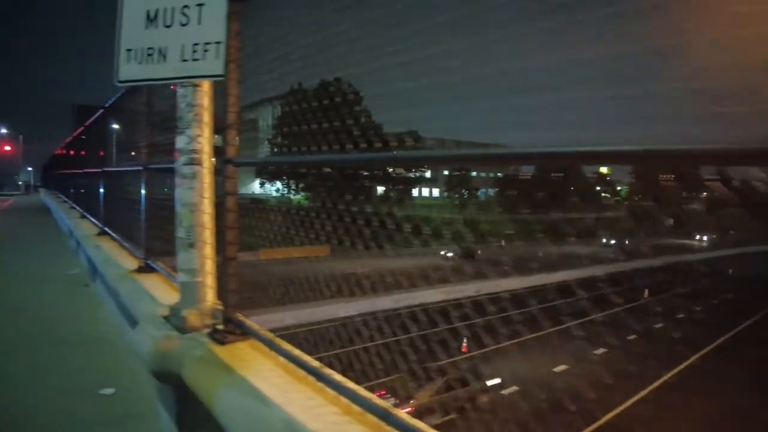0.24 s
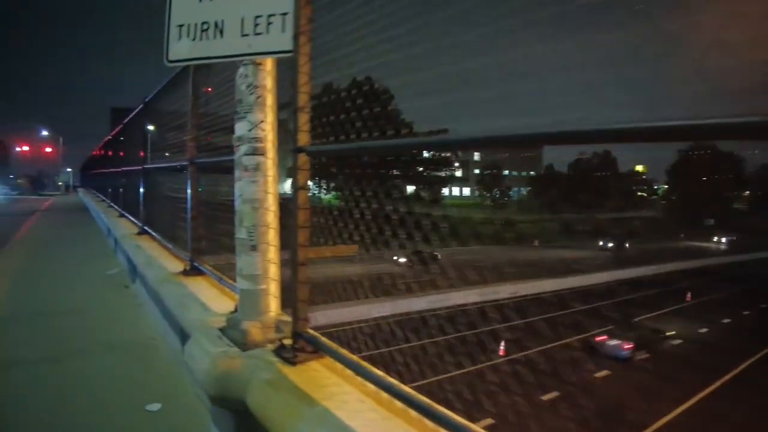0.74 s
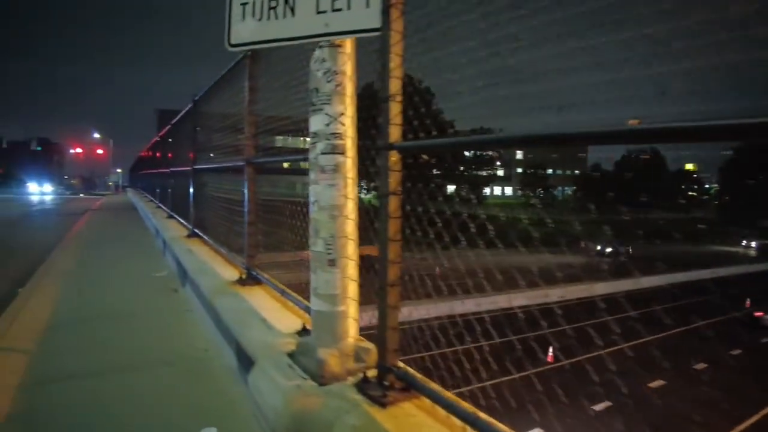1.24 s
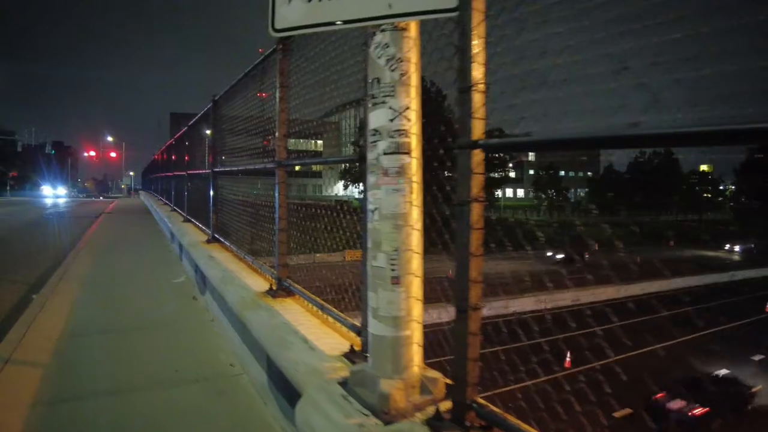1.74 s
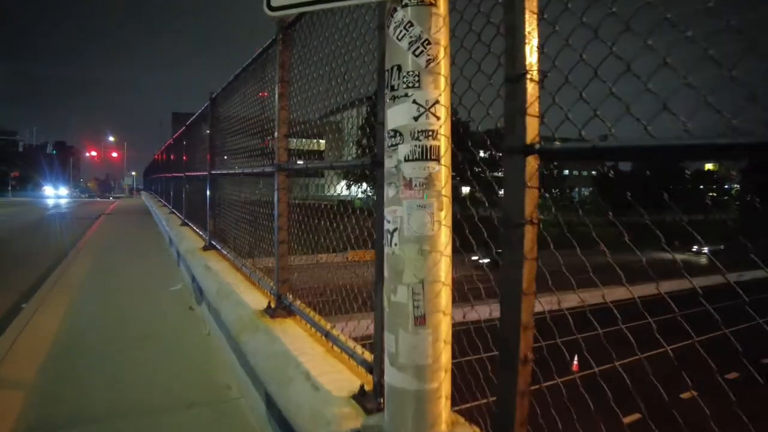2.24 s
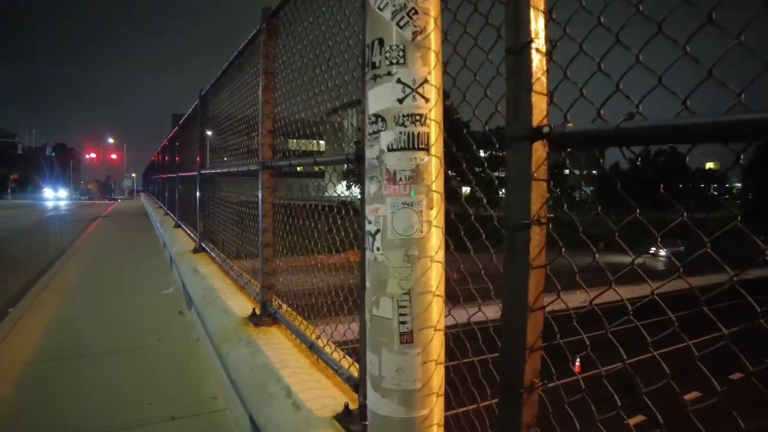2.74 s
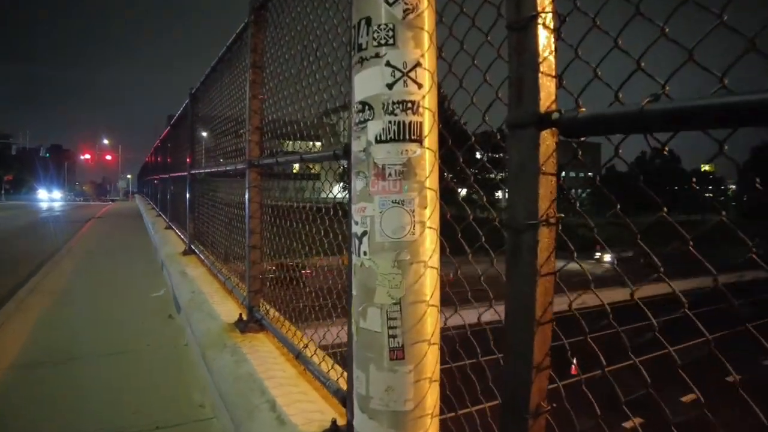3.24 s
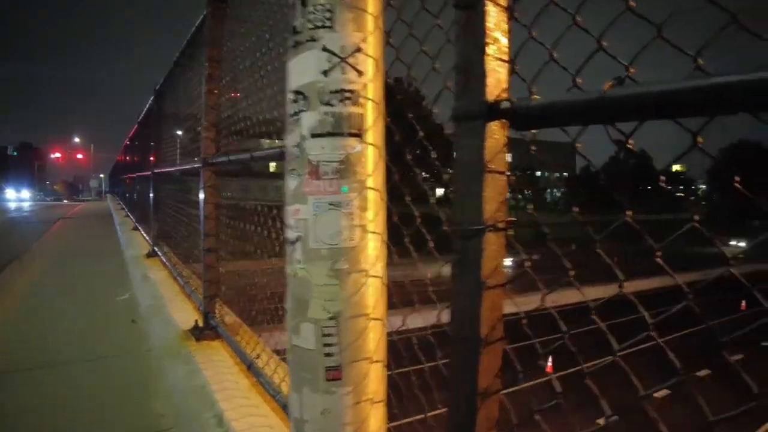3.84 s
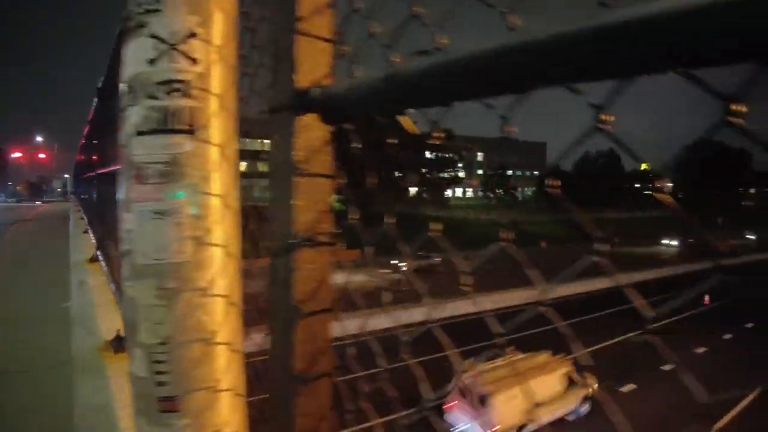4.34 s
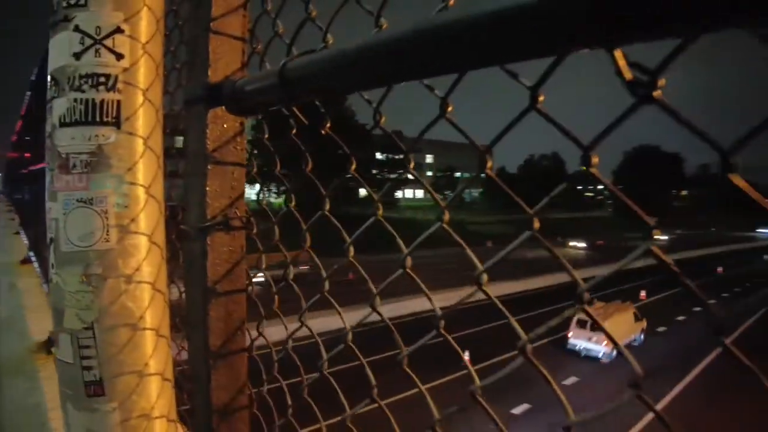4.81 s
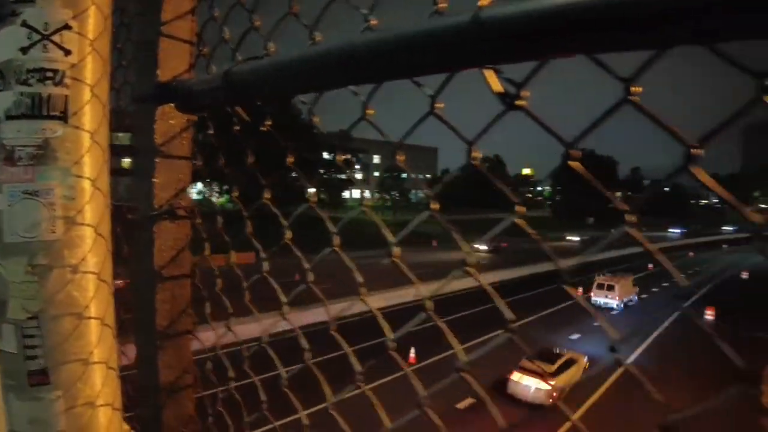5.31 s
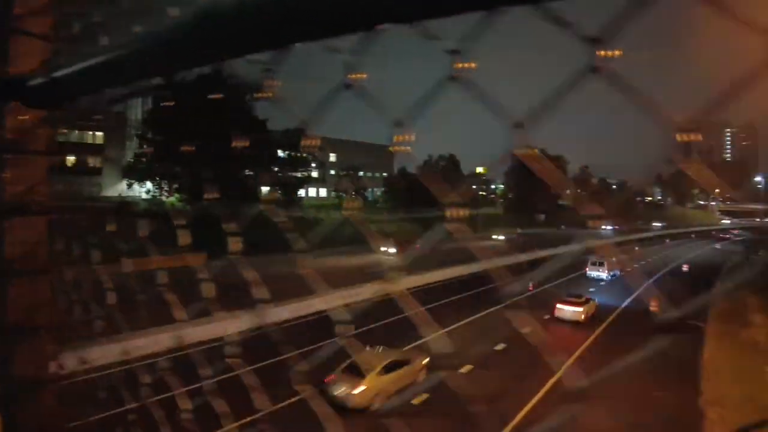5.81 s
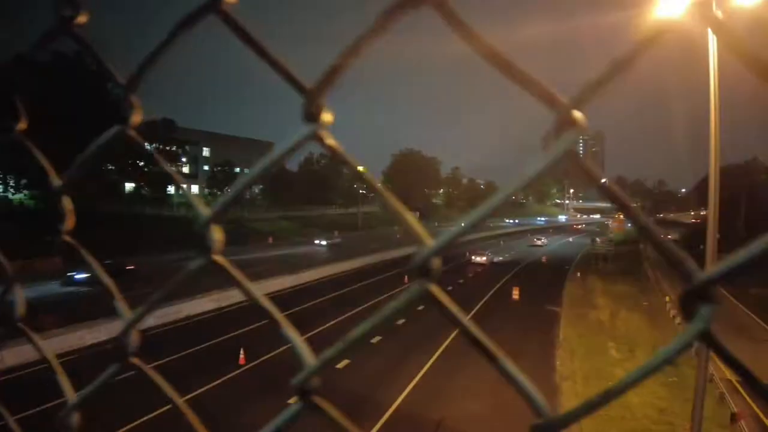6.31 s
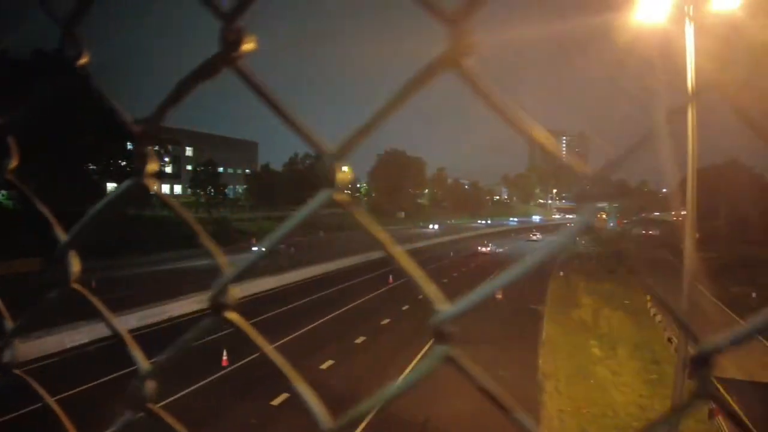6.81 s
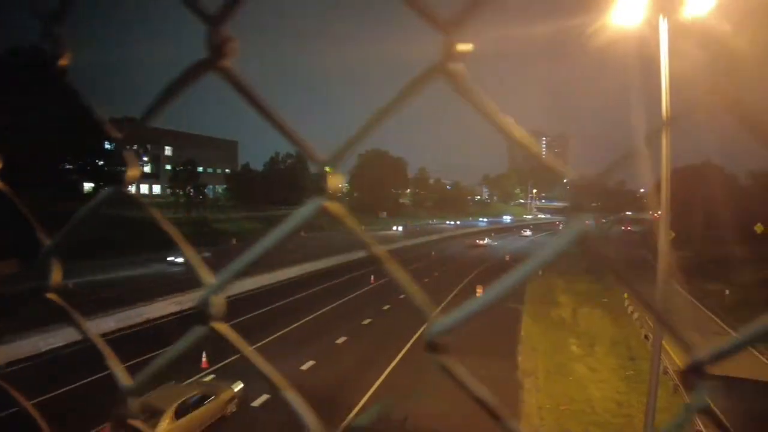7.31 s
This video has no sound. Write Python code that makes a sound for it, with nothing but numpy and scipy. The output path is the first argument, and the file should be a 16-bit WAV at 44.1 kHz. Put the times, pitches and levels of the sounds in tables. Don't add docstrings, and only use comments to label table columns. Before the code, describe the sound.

Continuous fast traffic beneath a bridge, deep exhaust rumble and hollow tyre roar rising and receding, interrupted by a fifth of a second of silence.

```python
import sys
import numpy as np
from scipy import signal
from scipy.io import wavfile
from scipy.ndimage import uniform_filter1d, map_coordinates

SR = 44100
rng = np.random.default_rng(int(sys.argv[2]) if len(sys.argv) > 2 else 0)


def transcribe(u):
    v = np.clip(np.atleast_2d(u).T, -1, 1)
    q = np.round(v * 32767).astype(np.int16)
    wavfile.write(sys.argv[1], SR, q)


def ratio_of_db(decibels):
    return 10 ** (np.asarray(decibels, float) / 20)


N = 333396
FRAME = 1024
SPEED_M_S = 35.4

# out_s, back_s, fade_out_s, fade_in_s
DROPOUT = (6.1672, 6.3675, .0035, .017)


def unit(x):
    return x / np.sqrt(np.mean(np.abs(x) ** 2) + 1e-20)


def along(points, hz, order=1):
    columns = np.transpose(points)
    return np.interp(np.log(hz + 1), np.log(columns[0] + 1), columns[order])


def curves(rows, t):
    s, *columns = np.transpose(rows)
    return [np.interp(t, s, column) for column in columns]


def wobble(rate):
    return map_coordinates(rng.standard_normal(400), [np.arange(N) * rate / SR])


def smooth(grid, bins, frames):
    return uniform_filter1d(uniform_filter1d(grid, size=bins, axis=0), size=frames, axis=1)


def rush(spectrum, patchy_db, streak_db=0):
    hz, t, z = signal.stft(rng.standard_normal((2, N)), SR, nperseg=FRAME)
    chance = rng.standard_normal(z.shape[1:])
    patches = unit(smooth(chance, 10, 7))
    streaks = unit(smooth(chance[::-1], 2, 24))
    z = z * ratio_of_db(along(spectrum, hz)[:, None] + patchy_db * patches + streak_db * streaks)
    return unit(signal.istft(z, SR, nperseg=FRAME)[1][:, :N])


def ticks():
    # start_s, level_db, pitch_hz, fade_by_60_db_s
    wire_rings = [
        (3.009, -54, 14300, .012),
        (6.38, -51, 4520, 0.16),
    ]
    out, t = np.zeros(N + SR), np.arange(SR // 4) / SR
    for s, db, hz, t60 in wire_rings:
        strength = ratio_of_db(db - 60 * t / t60) * (1 - np.exp(-t / 0.0021))
        unsteady = np.cumsum(rng.normal(0, .08, len(t)))
        out[round(s * SR):][:len(t)] += strength * np.sin(2 * np.pi * hz * t + unsteady)
    return out[:N]


def drones():
    # start_s, end_s, start_pitch_hz, end_pitch_hz, level_db
    engine_tones = [(0.465, 1.746, 70, 64.3, -37), (2.163, 3.094, 87.8, 79.6, -35),
                    (2.193, 3.678, 54.7, 60.3, -34), (2.007, 3.205, 185.8, 181.9, -39.5),
                    (3.0, 4.3, 183.4, 178, -41.5), (3.91, 4.614, 66.4, 70.7, -34.5),
                    (4.44, 5.5, 99.8, 97.4, -37.5), (5.504, 6.6, 103.6, 100.1, -37),
                    (4.948, 5.55, 42.54, 41, -33), (5.602, 6.247, 55.8, 59.2, -33.5),
                    (6.51, 7.402, 50, 47.2, -37)]
    waver_share, wavers_per_s = .028, 6
    t, out = np.arange(N) / SR, np.zeros(N)
    for start, end, start_hz, end_hz, db in engine_tones:
        u = np.clip((t - start) / (end - start), 0, 1)
        hz = start_hz + (end_hz - start_hz) * u
        hz += waver_share * start_hz * wobble(wavers_per_s)
        swell = np.sqrt(np.sin(np.pi * u)) * ratio_of_db(db + 4.5 + 0.71 * wobble(wavers_per_s))
        out += swell * np.sin(2 * np.pi * np.cumsum(hz) / SR)
    return out


def hums():
    # start_s, end_s, start_pitch_hz, end_pitch_hz, level_db
    tread_tones = [(0.4, 1.009, 560, 581, -39), (0.7, 1.296, 1390, 1370, -46.5), (0.8, 1.8, 930, 905, -41),
                   (1.65, 2.2, 1245, 1253, -43), (1.9, 2.503, 840, 807, -47), (2.3, 3.3, 730, 760, -46),
                   (2.5, 3.1, 1310, 1304, -49), (2.6, 3.2, 830, 788, -54), (3.5, 4.0, 870, 887, -55),
                   (4.3, 4.896, 960, 908, -45), (4.4, 5.0, 680, 680, -43.5), (4.9, 5.6, 880, 860, -43.5),
                   (5.4, 6.2, 730, 701, -42), (5.7, 6.2, 1090, 1058, -46.5), (6.3, 6.903, 960, 940, -46),
                   (6.5, 7.0, 1040, 1016, -46)]
    waver_share, flicker_db, flickers_per_s = .02, 4, 16
    out = np.zeros(N)
    waver, flicker = wobble(2 * flickers_per_s), wobble(flickers_per_s)
    for k, (start, end, start_hz, end_hz, db) in enumerate(tread_tones):
        span = np.arange(round(start * SR), round(end * SR))
        u = np.linspace(0, 1, len(span))
        own = (span + k * SR // 2) % N
        hz = start_hz + (end_hz - start_hz) * u + waver_share * start_hz * waver[own]
        swell = np.sqrt(np.abs(np.sin(np.pi * u))) * ratio_of_db(db + flicker_db * flicker[own])
        out[span] += swell * np.sin(2 * np.pi * np.cumsum(hz) / SR)
    return out


def crowd(far_db, levels_db, shapes_db):
    single = np.sum(ratio_of_db(levels_db[:, None] + shapes_db) ** 2, axis=0)
    return 10 * np.log10(ratio_of_db(far_db) ** 2 + single)


def engine_levels(t):
    # closest_s, exhaust_db, engine_bay_db, intake_db
    passes = [(0.0, -31.5, -42.5, -39.5), (0.62, -39, -36.5, -39), (0.92, -28, -40, -35.5),
              (1.5, -32, -39, -38.5), (2.12, -30, -38.5, -41), (1.8, -41.5, -42.5, -41.5),
              (2.4, -31.5, -39, -34.5), (2.7, -26.5, -35.5, -39.5), (2.55, -36, -40.5, -40.5),
              (2.95, -34.5, -42, -41), (3.3, -28.5, -47.5, -42.5), (3.62, -30, -37, -43.5),
              (4.2, -30, -43.5, -39.5), (4.5, -50, -37.5, -44.5), (4.82, -29.5, -42, -39),
              (5.4, -47.5, -43, -41), (5.78, -31, -42.5, -39), (6.42, -35.5, -43, -39.5),
              (6.68, -32, -52, -45.5), (7.1, -40, -41.5, -39), (7.45, -36, -44.5, -41.5)]
    s, *levels_db = np.transpose(passes)
    engine_m = 10.65
    shape_db = -20 * np.log10(1 + (SPEED_M_S * (t - s[:, None]) / engine_m) ** 2)
    far_levels_db = (-34.5, -44, -44.5)
    return [crowd(far_db, db, shape_db) for far_db, db in zip(far_levels_db, levels_db)]


def tyre_levels(t):
    # start_s, roar_db, tread_db, hiss_db, first_open_distance_m
    cars = [(0.3, -38, -37.5, -57, 5.7), (0.52, -38.5, -43, -52.5, 20), (0.76, -32, -35, -46, 11.5),
            (0.92, -45, -47, -51, 12), (1.15, -42, -54, -49.5, 10), (1.62, -33, -39.5, -51.5, 6.8),
            (1.92, -35.5, -37, -47, 19), (2.65, -33, -45.5, -51.5, 20), (2.98, -42, -42, -54, 11),
            (3.35, -51, -46.5, -48.5, 5.7), (4.2, -36, -42, -53, 9.8), (4.33, -51, -45, -51, 9.2),
            (4.4, -44, -45, -50, 11), (4.48, -29, -34.5, -48.5, 4.3), (4.8, -31, -34, -46, 6.8),
            (4.62, -45, -45, -49.5, 14), (4.98, -44, -46, -51, 14), (5.15, -33.5, -35.5, -45.5, 9.5),
            (5.5, -40.5, -36, -47, 16), (5.82, -34.5, -35.5, -45.5, 25), (6.05, -41, -41, -51, 15),
            (6.3, -34, -39, -51.5, 12), (6.62, -36, -48, -58.5, 13), (7.0, -45, -47, -63, 20),
            (7.18, -50, -39.5, -45.5, 14), (7.5, -35, -38, -45, 12)]
    s, roar_db, tread_db, hiss_db, near_m = np.transpose(cars)
    emerge_s, air_db_per_m = 0.16, 0.43
    since, near_m = t - s[:, None], near_m[:, None]
    away_m = np.hypot(near_m, SPEED_M_S * since)
    open_air = 1 / (1 + np.exp(-np.clip(since / emerge_s + 1, -40, 40)))
    heard = (s[:, None] > DROPOUT[0]) == (t > DROPOUT[0])
    shape_db = 20 * np.log10(open_air * heard * near_m / away_m + 1e-6)
    hiss_shape_db = shape_db - air_db_per_m * (away_m - near_m)
    return [crowd(-36.5, roar_db, shape_db), crowd(-42, tread_db, shape_db),
            crowd(-54, hiss_db, hiss_shape_db)]


def traffic():
    # pitch_hz, level_db (per Hz)
    exhaust_tone = [(14, -58), (25, -12), (40, 2.5), (60, -6.5), (100, 3), (130, -8), (170, -26),
                    (300, -81)]
    bay_tone = [(60, -34), (110, -29.5), (150, -2), (190, 2), (250, -5), (330, -15.5), (600, -62.5)]
    intake_tone = [(150, -41), (240, -5.5), (320, -1), (480, -4), (620, -5), (800, -15), (1300, -69)]
    tyre_tone = [(200, -37), (420, -9), (600, -8), (750, -1.5), (950, 0), (1150, -3), (1400, -12),
                 (2200, -23), (4000, -65)]
    tread_tone = [(700, -22), (1150, -1), (1350, 0), (1700, -2), (2200, -10.5), (3200, -16), (5000, -56.5),
                  (9000, -58.5)]
    hiss_tone = [(800, -36.5), (1800, -31.5), (2500, 1.5), (3200, -1), (4500, -4), (5500, -11),
                 (7000, -16.5), (8000, -17.5), (11000, -20), (12500, -23), (15500, -26), (15900, -36)]
    spray_tone = [(3000, -31.5), (5500, -1.5), (8000, 5.5), (11000, -0.5), (15400, -2), (16000, -24.5)]
    t = np.arange(N) / SR
    slow = t[::64]
    levels = engine_levels(slow) + tyre_levels(slow)
    exhaust_db, bay_db, intake_db, tyre_db, tread_db, hiss_db = [np.interp(t, slow, db) for db in levels]
    flutter = wobble(13)
    streak_db = 1.5
    exhaust = ratio_of_db(exhaust_db) * rush(exhaust_tone, patchy_db=-0.4)
    bay = ratio_of_db(bay_db + 0.225 * wobble(12.0)) * rush(bay_tone, patchy_db=1.86)
    bay += ratio_of_db(intake_db + 0.3 * wobble(5.5)) * rush(intake_tone, patchy_db=1.04)
    tyres = ratio_of_db(tyre_db + .3 * flutter) * rush(tyre_tone, .8, streak_db)
    tyres += ratio_of_db(tread_db + .3 * flutter) * rush(tread_tone, 1.0, streak_db)
    near = np.clip((hiss_db + 52.0) / 8, 0, 1)
    hiss = ratio_of_db(hiss_db + .45 * flutter + .9 * wobble(30)) * rush(hiss_tone, patchy_db=1.3)
    hiss += ratio_of_db(hiss_db - 15 + .6 * flutter) * near * rush(spray_tone, patchy_db=1.5)
    return exhaust + bay + tyres + hiss


def ports(pair):
    # time_s, near_lanes_side, far_lanes_side (1 right to -1 left), treble_from_all_round (0-1)
    bearing = [(0, .6, .4, 0), (.5, 1, .65, 0), (1.1, 1, .95, 0), (2.7, 1, 1.12, 0), (3.3, 1, 1.05, .1),
               (4, .8, 1.05, .2), (4.45, -.05, 1, .1), (5.1, -.05, .75, 0), (6.2, -.15, 0, .05),
               (6.5, -.15, -.65, .3), (6.95, -.3, -.9, .3), (7.2, -.75, -.75, .2)]
    # pitch_hz, phase_radians
    path_lead = [(1, 0), (150, -.05), (450, -.3), (1290, -.72), (2200, -1.45), (3100, -2.25), (3450, -1.9),
                 (3700, -.9), (3950, -1.6), (4200, -2.8), (5300, -3.2), (6200, -4.2), (6800, -6), (6900, 0)]
    shell_lead = [(1, 0), (150, -.1), (400, -.7), (690, -.9), (1030, -2), (1180, -2.5), (1205, 0)]
    # pitch_hz, road_ahead (0-1), road_to_one_side (0-1)
    likeness = [(60, .985, .985), (300, .97, .96), (800, .66, .7), (1000, .45, .74), (1180, .38, .78),
                (1300, .93, .88), (2900, .6, .75), (3700, .8, .2), (4350, .55, .72), (5300, .62, .15),
                (6000, .5, .42), (7200, .82, .55), (9300, .65, .28), (12600, .4, .2), (14000, .65, .4)]
    # pitch_hz, left_minus_right_db
    tilt = [
        (100, -0.5),
        (500, 0.5),
        (1000, 2),
        (1300, 0),
        (4500, -0.8),
        (10000, 0.3),
    ]
    # time_s, centre_hz, depth_db
    notch = [(0, 1130, -0.5), (1.0, 1080, 1.5), (2.0, 1120, 1.5), (3.0, 1130, 4.5), (4.0, 1100, 3),
             (4.5, 1100, 4), (5.05, 1090, 4), (5.4, 1150, 1.5), (6.2, 1180, 2), (6.7, 1170, 5),
             (7.0, 1150, -1.5), (7.5, 1150, 0)]
    # pitch_hz, level_db
    grille = [
        (5000, 1),
        (6200, 2.4),
        (7400, 0),
        (9400, 1),
        (10200, -0.9),
        (11500, 0),
        (12700, 2),
        (14000, 1),
    ]
    hz, t, (shared, apart) = signal.stft(pair, SR, nperseg=FRAME)
    path, shell, diffuse = curves(bearing, t)
    pan_db = -1.1 * path
    lead = np.outer(along(path_lead, hz), path) + np.outer(along(shell_lead, hz), shell)
    aside = np.clip(np.abs(path), 0, 1)
    alike = np.outer(along(likeness, hz), 1 - aside) + np.outer(along(likeness, hz, order=2), aside)
    alike *= 1 - np.outer(np.clip(hz / 2000, 0, 1), diffuse)
    turn = np.arccos(np.clip(alike, 0, 1)) / 2
    difference_db = along(tilt, hz)[:, None] + np.outer(hz > 1200, pan_db)
    half = np.exp(.5j * lead) * ratio_of_db(difference_db / 2)
    left = (np.cos(turn) * shared + np.sin(turn) * apart) * half
    right = (np.cos(turn) * shared - np.sin(turn) * apart) / half
    notch_hz, notch_db = curves(notch, t)
    dip_db = notch_db / (1 + ((hz[:, None] - notch_hz) / 70) ** 4)
    colour = ratio_of_db((along(grille, hz) * (hz > 4000))[:, None] - dip_db)
    return signal.istft(np.array([left, right]) * colour, SR, nperseg=FRAME)[1][:, :N]


def watery_treble(x):
    # pitch_hz, extra_threshold_db
    dead_slope = [
        (8000, -2),
        (10800, -2),
        (11600, .5),
        (12600, 2.5),
        (14000, 2.5),
        (15000, .5),
    ]
    start_hz, top_hz = 8000, 15100
    dead_db, spare_db, thrift_db, top_dead_db = -91, .3, 2.6, -86.8
    offset = 552
    hz, t, z = signal.stft(np.pad(x, ((0, 0), (offset, 0))), SR, nperseg=2 * FRAME)

    def blocks(draw, bins):
        values = draw((len(hz) // bins + 1, len(t) // 2 + 1))
        return np.kron(values, np.ones((bins, 2)))[:len(hz), :len(t)]

    power = np.mean(np.abs(z) ** 2, axis=0)
    lines, band = smooth(power, 4, 2), smooth(power, 41, 5)
    more_above = np.clip((hz[:, None] - 9000) / 4000, .3, 1)
    thrift = ratio_of_db(thrift_db * blocks(rng.standard_normal, 16) * more_above) ** 2
    floor = ratio_of_db(dead_db + along(dead_slope, hz)[:, None]) ** 2
    dead = thrift * np.minimum(floor, band * ratio_of_db(spare_db) ** 2)
    weak = ratio_of_db(np.interp(hz, [8000, 14000], [-12, -5]))[:, None] ** 2
    dead = np.maximum(dead, thrift * band * weak)
    below = hz < top_hz
    loud_hiss = band[below][-20] / thrift[below][-1] > ratio_of_db(top_dead_db) ** 2
    dead[hz > top_hz] = np.where(loud_hiss, 0, 1)
    low_treble = ((hz > 4500) & (hz < 6400))[:, None]
    starved = (blocks(rng.random, 8) < .012) & low_treble & (band < ratio_of_db(-72) ** 2)
    keep = ((lines > dead) | (hz < start_hz)[:, None]) & ~starved
    return signal.istft(z * keep, SR, nperseg=2 * FRAME)[1][:, offset:offset + N]


def scene():
    tones = (drones() + hums()) * [[1], [0]]
    return ports(traffic() + tones) + ticks() * ratio_of_db([[2.5], [-2.5]])


def band_limit(x):
    return signal.sosfilt(signal.butter(12, 15490, fs=SR, output="sos"), x)


def record(dry):
    out, back, fall, rise = DROPOUT
    t = np.arange(N) / SR
    fade_out = np.clip((out - t) / fall, 0, 1)
    fade_in = np.clip((t - back) / rise, 0, 1) ** 1.3
    thinned = watery_treble(dry)
    rounded = thinned / (1 + np.abs(thinned / .34) ** 4) ** (1 / 4)
    return band_limit(np.maximum(fade_out, fade_in) * rounded)


dry = scene()
out = record(dry)
transcribe(out)
```